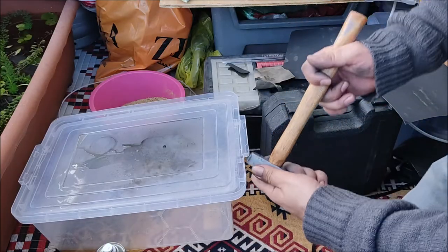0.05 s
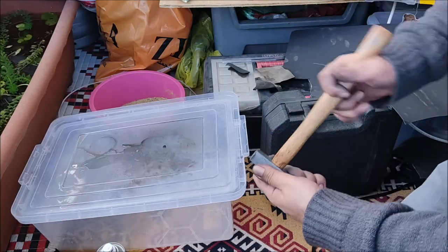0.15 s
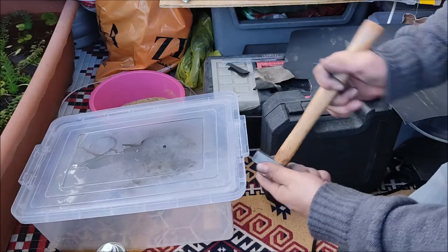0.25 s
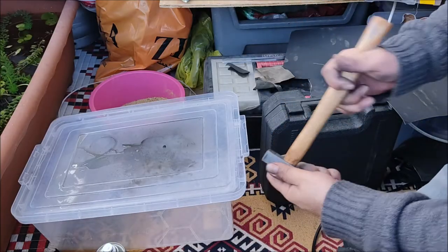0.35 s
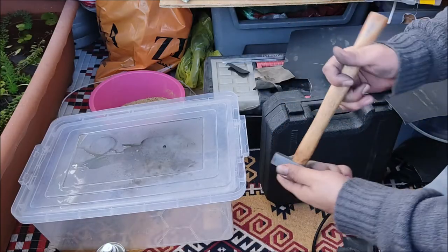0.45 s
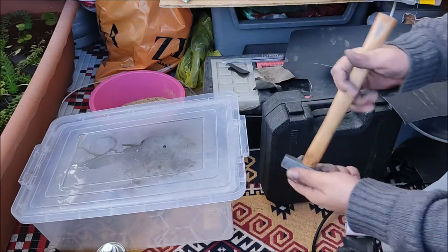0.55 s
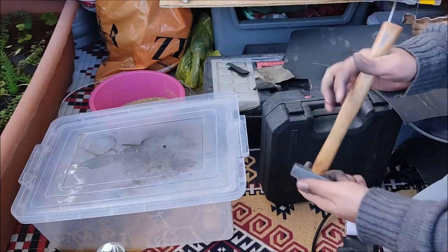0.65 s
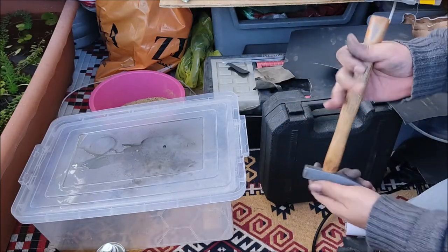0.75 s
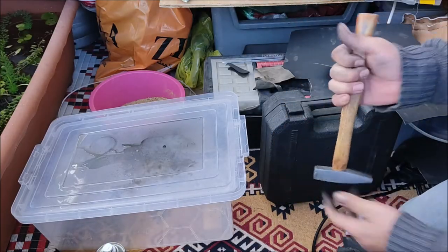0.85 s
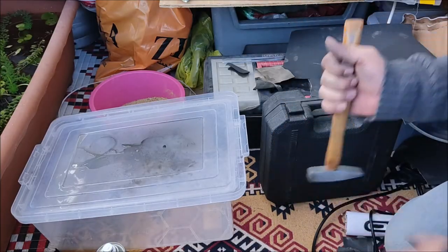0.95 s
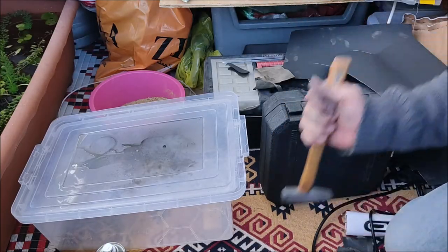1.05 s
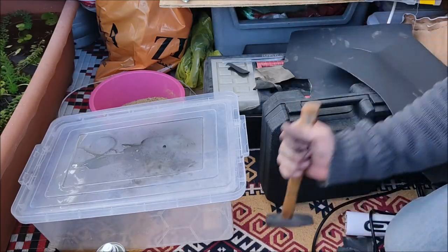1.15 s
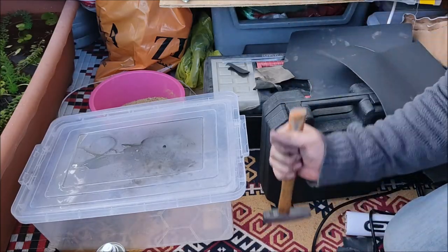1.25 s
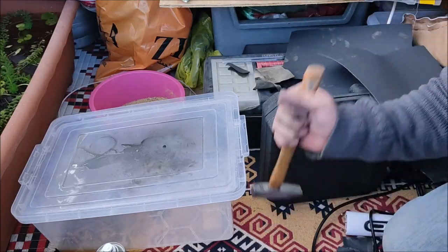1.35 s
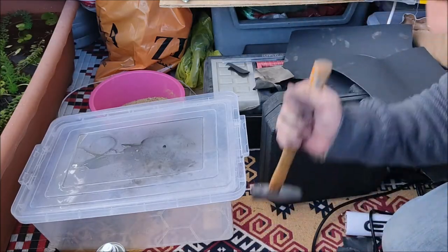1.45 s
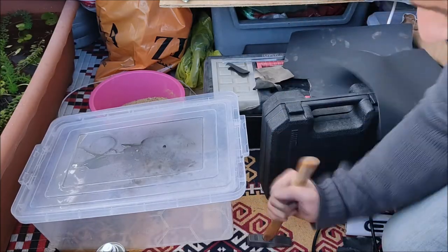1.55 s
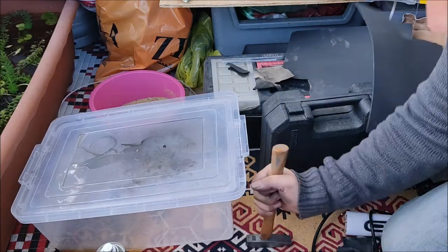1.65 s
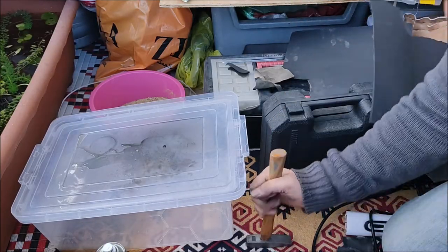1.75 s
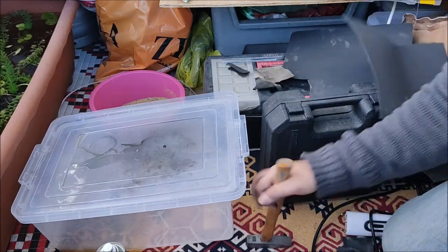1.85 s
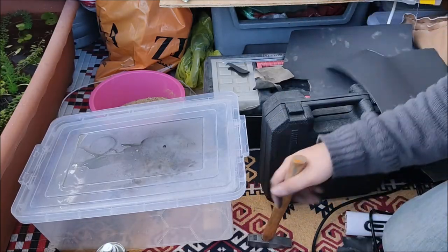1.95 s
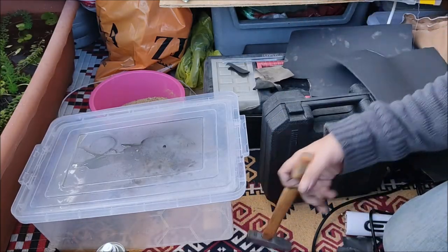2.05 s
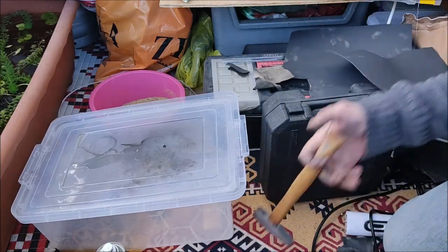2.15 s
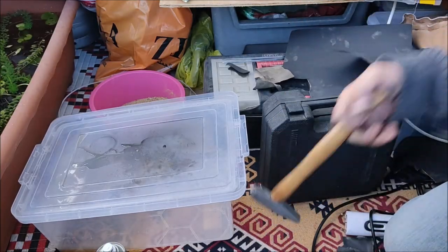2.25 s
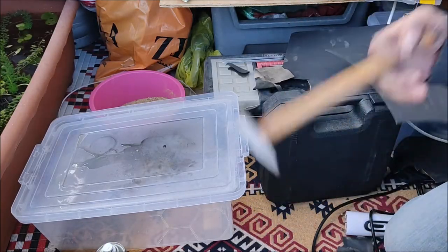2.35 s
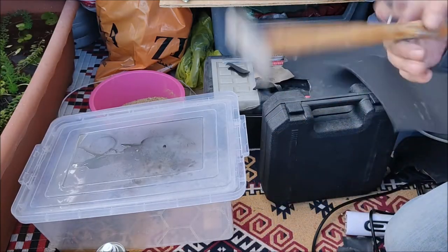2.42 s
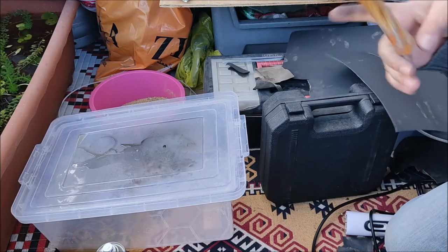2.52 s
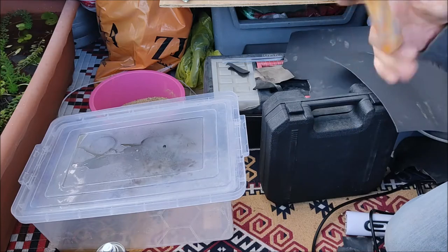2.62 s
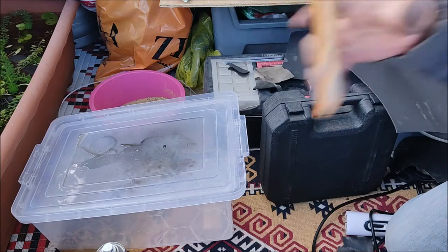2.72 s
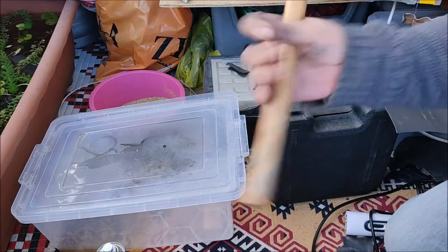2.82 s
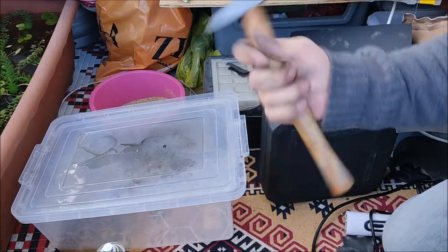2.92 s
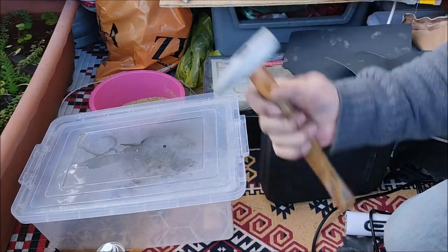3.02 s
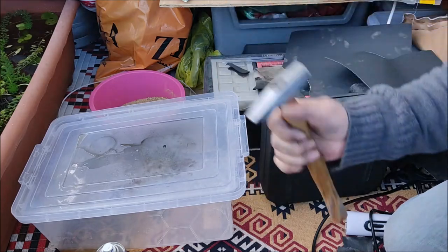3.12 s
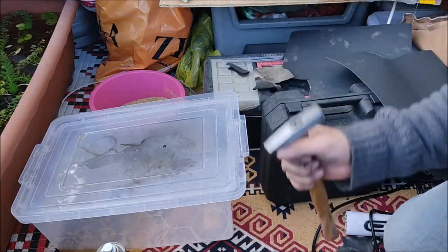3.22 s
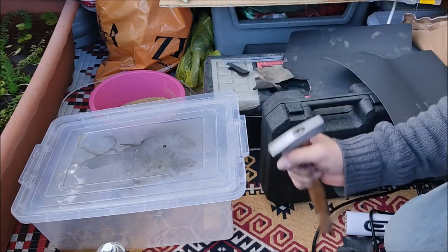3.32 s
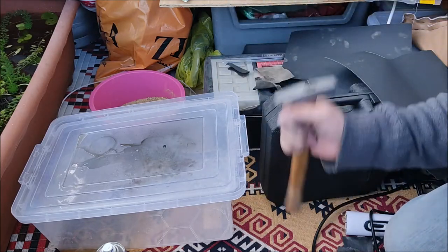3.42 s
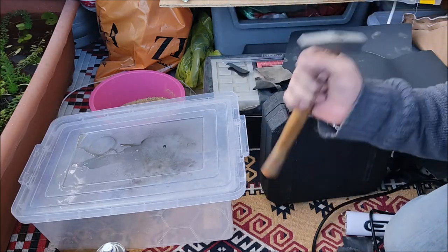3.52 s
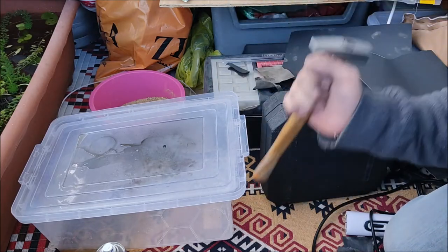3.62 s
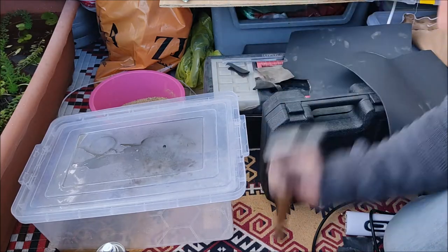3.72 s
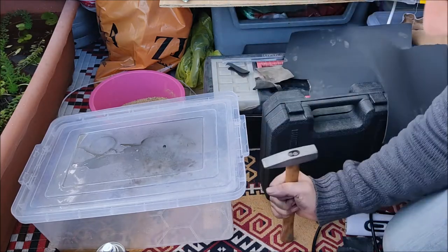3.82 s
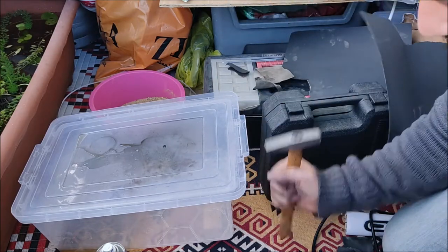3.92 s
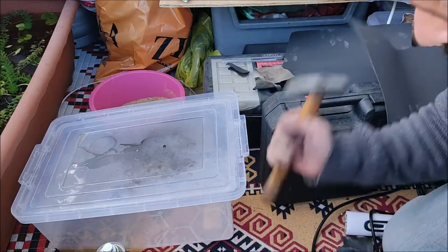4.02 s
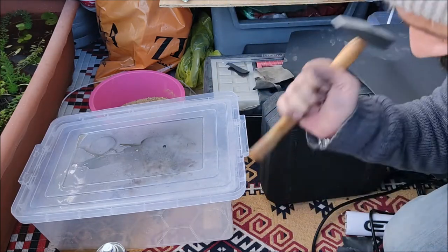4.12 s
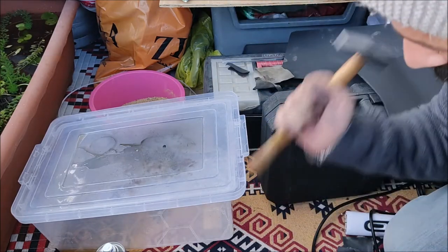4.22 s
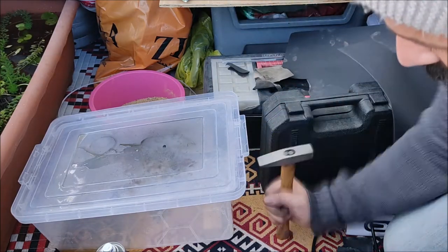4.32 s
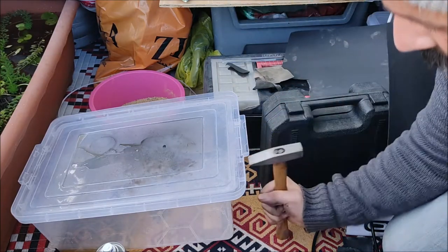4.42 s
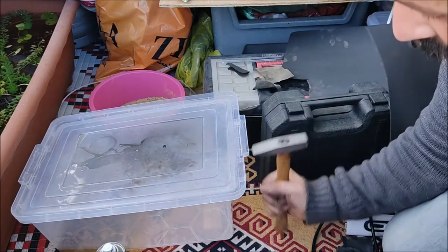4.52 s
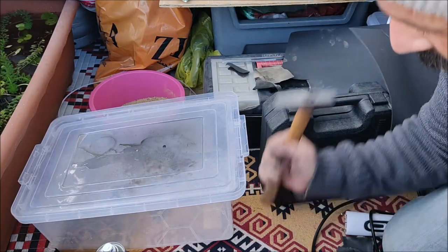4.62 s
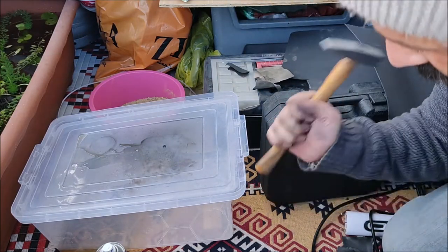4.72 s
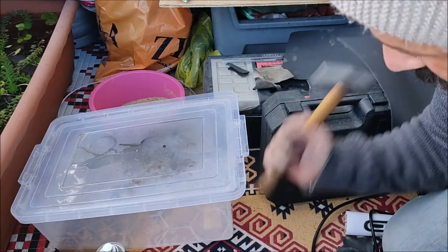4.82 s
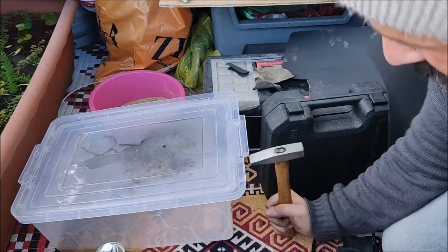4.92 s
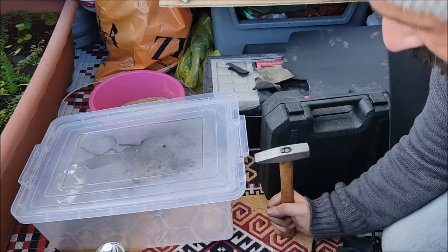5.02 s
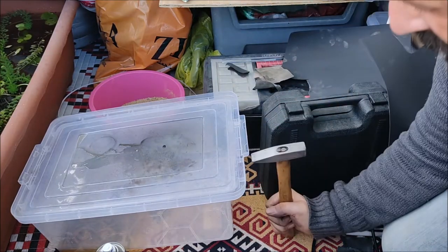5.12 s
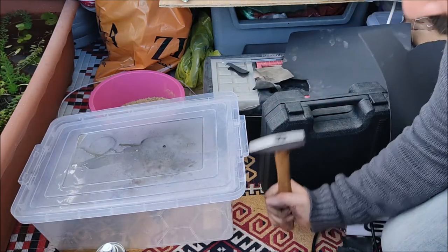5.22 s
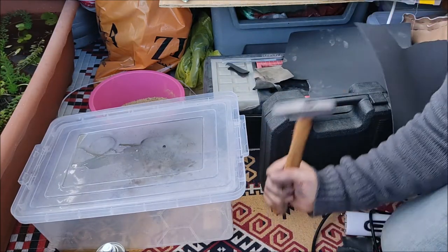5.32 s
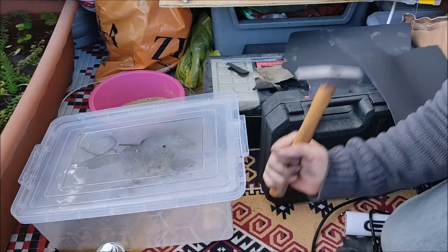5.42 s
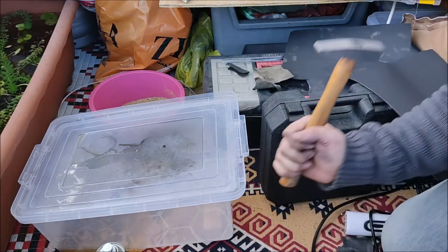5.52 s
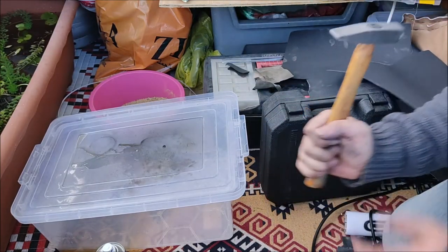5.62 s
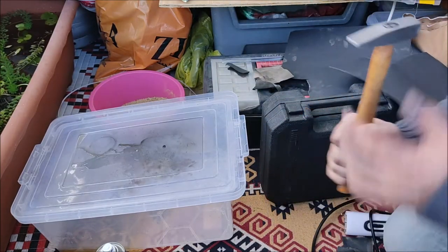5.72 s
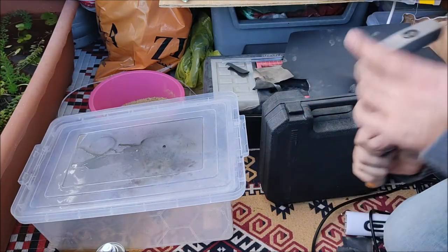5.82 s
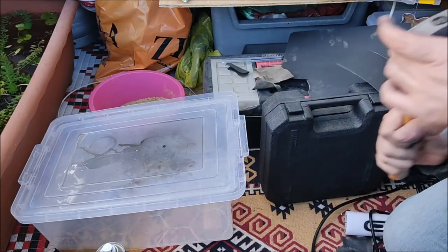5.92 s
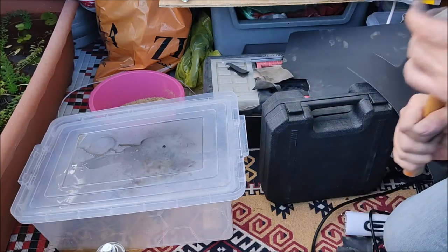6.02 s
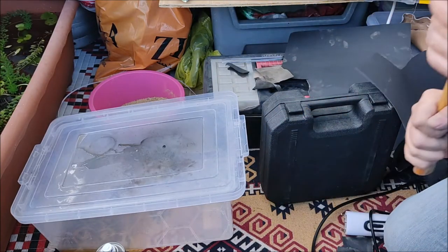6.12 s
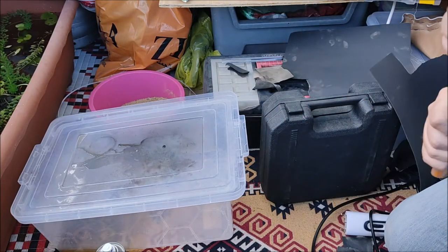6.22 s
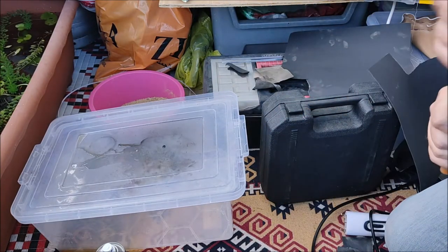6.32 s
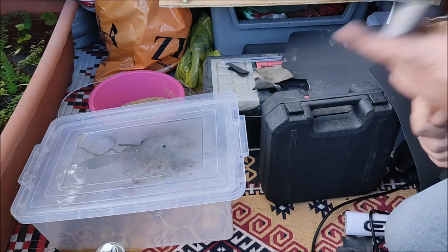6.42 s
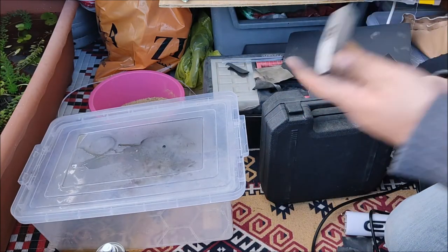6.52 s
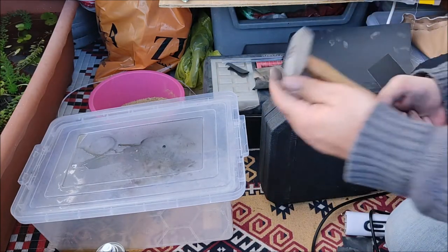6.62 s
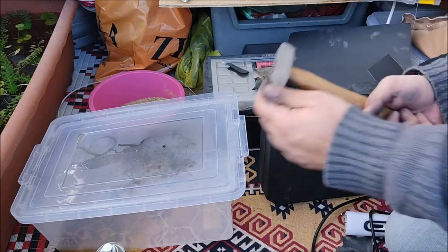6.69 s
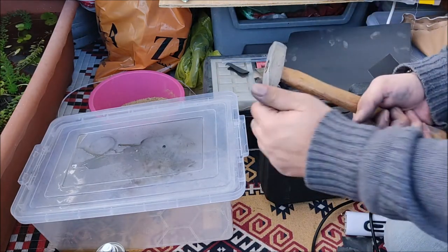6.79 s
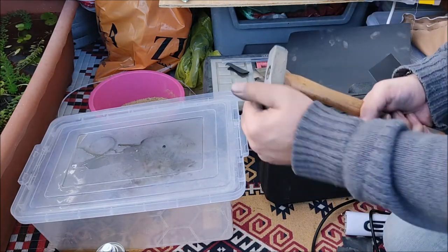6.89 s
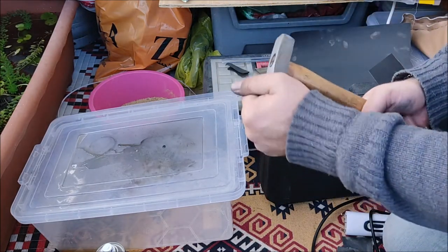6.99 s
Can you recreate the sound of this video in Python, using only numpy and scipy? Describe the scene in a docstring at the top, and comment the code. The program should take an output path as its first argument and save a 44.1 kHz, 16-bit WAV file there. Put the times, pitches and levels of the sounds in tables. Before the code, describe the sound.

Close knocks of a wooden-handled hammer on a hollow rugged floor, evenly spaced, with wool rustle, finger hiss, small taps and faint distant traffic.

```python
"""Hammer on a rug-covered hollow floor

Hammer knocked in a small cluttered space: once head down, three times handle down; an earlier knock dies at the start.
Each contact is a noise crack, decaying sine modes of floor and head, and a short dense tail of decaying noise bands.
Sleeves and fingers rustle as coloured noise under level curves; small knocks fall between; a thin narrow-band scrape
follows the first head-down blow. A low, wavering sine hoot is heard only at the start.
Gusts of 12-26 Hz noise rumble on the microphone over a dull wash of far traffic."""
import sys
import numpy as np
from scipy import signal
from scipy.io import wavfile

SR = 44100
rng = np.random.default_rng(int(sys.argv[2]) if len(sys.argv) > 2 else 0)


def magnitude_from_level(level_db):
    """Linear magnitude for a level in decibels (20 dB per decade)."""
    exponent = np.asarray(level_db, float) / 20
    return 10 ** exponent


def unload_wav(signal):
    """Save mono or channel-first audio to the path in sys.argv[1] as 16-bit WAV at rate SR, clipped to [-1, 1]."""
    wavfile.write(
        sys.argv[1],
        SR,
        np.round(np.clip(np.atleast_2d(signal).T, -1, 1) * 32767).astype(np.int16),
    )


N = 310993  # samples

# Spectra and levels are relative: source trims and the microphone chain follow.
# stereo pair: f/Hz, left-right correlation
CORRELATION = [(60, 0.76), (180, 0.83), (550, 0.37), (1650, -0.061), (4970, 0.082), (15000, -0.3)]
# stereo pair: f/Hz, left minus right/dB
LEFT_LEAN = [(60, 6.5), (120, 3), (240, 6.5), (480, 4), (950, 3), (1890, -0.5), (3770, -2), (7520, -8),
             (15000, -2.5)]
BAND_EDGES_HZ = 40 * 2 ** np.arange(0, 8.7, 1 / 3)  # third octaves

# far traffic spectrum: f/Hz, density/dB per Hz
TRAFFIC_SPECTRUM = [(40, -11.5), (60, -12), (95, -8), (140, -28), (200, 0.5), (260, -19.5), (320, -10.5),
                    (420, -15), (800, -19.5), (1400, -29.5), (3000, -51.5), (6000, -74)]
# far traffic passing: t/s, level/dB
TRAFFIC_LEVEL = [(0.0, -53.5), (0.9, -56), (1.8, -55.5), (2.6, -55), (3.2, -52), (4.0, -51), (4.8, -48),
                 (5.4, -53.5), (6.1, -53), (6.7, -58), (7.05, -54)]
# air on the microphone: t of crest/s, half length/s, level/dB
AIR_GUSTS = [(.2, 0.11, -58), (1.204, 0.11, -62), (3.154, 0.3, -50), (3.794, 0.09, -48), (4.205, 0.22, -62),
             (4.7, 0.1, -61), (5.0, 0.18, -55.5), (5.7, 0.16, -59), (6.609, 0.17, -69), (7.0, 0.14, -66)]
STILL_AIR_DB = -63.5

# hoot: t/s, level/dB
HOOT_LEVEL = [(0.0, -50), (0.1, -53), (0.29, -44.5), (0.42, -53), (0.56, -59.5), (0.63, -50.5)]
HOOT_HZ, SAG_FROM_S, SAG_HZ_PER_S = 438, .42, 250
FLUTTER_DB, FLUTTER_HZ, FLUTTER_CREST_S, FLUTTER_UNTIL_S = 5, 20, 0.184, 0.29

# head dragged over the rug: t/s, f/Hz, level/dB
SCRAPE_TRACK = [(1.8, 1740, -62), (1.879, 1760, -53), (2.0, 1870, -56), (2.121, 1793, -67),
                (2.3, 1770, -52), (2.4, 1726, -59)]

# wool cloth: f/Hz, density/dB per Hz
CLOTH_SPECTRUM = [(300, -12.5), (500, -3.5), (900, -3), (1700, -0.5), (3600, -9.5), (6000, -13),
                  (12000, -45)]
# skin on wood: f/Hz, density/dB per Hz
SKIN_SPECTRUM = [(1200, -20.5), (2500, 6.5), (4000, 0.5), (6000, 2.5), (9000, 1.5), (15500, 2.5)]
# hand movements: t of start/s, length/s, cloth level/dB, skin hiss level/dB
HAND_MOVES = [(.1, 0.028, -72, -71), (.225, 0.022, -54, -68), (.3, 0.26, -62, -63.5),
              (.49, 0.024, -52.5, -70), (.632, 0.38, -56, -52.5), (1.045, .1, -56.5, -56.5),
              (1.168, 0.1, -45, -50), (1.255, 0.11, -46, -47), (1.355, 0.086, -44.5, -55.5),
              (1.48, 0.2, -50.5, -54.5), (1.865, 0.029, -42.5, -52.5), (1.957, .04, -42.5, -56),
              (2.02, 0.033, -40.5, -47.5), (2.15, 0.076, -52.5, -53), (2.232, 0.13, -43.5, -56),
              (2.475, 0.074, -44, -45.5), (2.57, 0.067, -51.5, -59), (2.705, 0.016, -53, -75),
              (2.805, 0.11, -74, -50), (2.89, 0.044, -58, -42), (2.985, 0.041, -58, -40),
              (3.14, .22, -60, -52), (3.36, 0.24, -71, -56.5), (4.07, 0.046, -47, -48.5),
              (4.195, 0.093, -44.5, -57), (4.65, 0.069, -44, -47), (4.74, 0.047, -50, -54.5),
              (4.84, 0.14, -53.5, -64), (5.3, 0.045, -47, -51.5), (5.385, 0.16, -47.5, -56),
              (5.605, 0.088, -42, -49.5), (5.7, 0.062, -46, -60), (5.832, 0.021, -48.5, -55),
              (5.89, 0.24, -53.5, -56), (6.1, 0.036, -45, -49.5), (6.18, 0.15, -53, -55.5),
              (6.26, 0.073, -46, -51.5), (6.345, 0.023, -43.5, -50), (6.51, 0.076, -83.5, -61.5),
              (6.75, 0.16, -65, -68.5), (6.87, 0.13, -69, -61)]
MOVE_RISE_DB_PER_S, MOVE_FALL_DB_PER_S = 690, 177.5
# hands at rest: cloth level/dB, skin hiss level/dB
HANDS_AT_REST = (-66.5, -63)
# sleeve on the way down: t before the blow/s, cloth level/dB, skin hiss level/dB
SLEEVE_SWING = (0.065, -48.5, -51)
# late dull wash after each full blow: length after the blow/s, cloth level/dB, skin hiss level/dB
LATE_WASH = (.21, -45.5, -57)
FULL_BLOW_DB = -35  # stronger contacts take an arm swing

# contacts, soft dull to hard bright: t/s, strength/dB, bass slope/dB per octave downwards,
# treble slope/dB per octave upwards, handle ring/dB
CONTACTS = [(-.08, -26, -4, -1.5, -6), (0.65, -71, 15, -6, -3), (1.053, -49, -15, -18, -3),
            (1.171, -51.5, -9, -18, 0.1), (1.6225, -17, -5.5, -6.5, -0.5), (1.9612, -55.5, 3.5, -1, -14),
            (2.489, -48, 5.5, -2, -5), (3.351, -60.5, 2, -17, 3), (3.8331, -24, 0.2, -3.5, 2.5),
            (4.4073, -21.5, -1, -4.5, 0.6), (4.9781, -21.5, -2, -6, 7), (5.836, -58.5, 6.5, -1, -10)]
# contact spectrum: low end f/Hz, hinge f/Hz, high end f/Hz
CONTACT_RANGE_HZ = (300, 1000, 7700)
# wooden handle, rings high with a hollow below: f/Hz, weight on handle ring (dB per dB)
HANDLE_RING = [(1000, 0), (1600, -0.5), (2600, 0.8), (4500, 1.5), (7700, 0.5)]
# hollow floor, with the steel head on top: f/Hz, level/dB, t60/s
RING_MODES = [(205, -6, .45), (252, -5, .44), (277, -8, .35), (320, -6, .33), (351, -6, .35),
              (394, -3, .34), (475, -4, .33), (528, -5, .33), (630, -5, .33), (682, 0, .29), (757, -3, .33),
              (833, -4, .3), (921, -2, .31), (1077, -6, .33), (1222, -9, .2), (1728, -13, .28),
              (2540, -10, .25), (2600, -10, .3), (2715, -10, .22), (2785, -13, .2), (4170, -18, .23),
              (7690, -6, .13)]
# first sound: f/Hz, density/dB per Hz
CRACK_SPECTRUM = [(100, -16.5), (500, -5), (1500, -10), (2700, -2.5), (5200, -8), (8500, -15.5),
                  (11000, -29.5), (15000, -51.5)]
CRACK_S, CRACK_RISE_S = .015, .001
# reflections: f/Hz, density/dB per Hz
TAIL_SPECTRUM = [(40, -19.5), (130, -9), (200, -10.5), (400, -3), (900, -2), (1300, -8), (2500, -5.5),
                 (5000, -7.5), (9000, -15), (15000, -22.5)]
# reflections: f/Hz, t60/s
TAIL_DECAY = [(60, 0.37), (160, 0.26), (420, 0.29), (1100, 0.26), (2910, 0.23), (7680, 0.18)]
FILL_S = .003

# left and right sound port: f/Hz, width/Hz, lift/dB
SOUND_PORTS = [(8810, 805, 20.5), (7600, 810, 11)]
HISS_DB, TOP_HZ = -70.5, 8390  # hiss ahead of the port response
TREBLE_STOP_HZ = 16300


def rms_one(x):
    """Scale to rms 1."""
    return x / np.sqrt(np.mean(x ** 2) + 1e-20)


def in_time(rows):
    """Interpolate the columns of a time table to one value per sample."""
    s, *columns = np.transpose(rows)
    return [np.interp(np.arange(N) / SR, s, c) for c in columns]


def at_hz(points, hz):
    """Read a spectrum on a log frequency axis."""
    table_hz, values = np.transpose(points)
    return np.interp(np.log(hz), np.log(table_hz), values)


def lean_db(hz):
    """Split the level difference of the stereo pair evenly: left up, right down."""
    return at_hz(LEFT_LEAN, hz) / 2 * np.array([[1], [-1]])


def drift(rate_hz):
    """Random drift of spread 1: noise through a double pole at rate_hz, run at SR / 40."""
    r = np.exp(-2 * np.pi * rate_hz * 40 / SR)
    noise = rng.standard_normal(N // 40 + 2002)
    slow = rms_one(signal.lfilter([1], [1, -2 * r, r * r], noise)[2000:])
    return np.interp(np.arange(N) / 40, np.arange(len(slow)), slow)


def bands(size, min_correlation=-1.0, spike=0.0):
    """Stereo noise bands, flat per Hz, with the pair's lean and correlation; a spike may open them."""
    white = rng.standard_normal((2, 2, size + 2000))  # two mid/side sets for alternate bands
    white[:, 0, 2050] -= spike
    for k, (low, high) in enumerate(zip(BAND_EDGES_HZ, BAND_EDGES_HZ[1:])):
        sos = signal.butter(2, [low, high], "band", fs=SR, output="sos")
        mid, side = signal.sosfilt(sos, white[k % 2])[:, 2000:]
        hz = np.sqrt(low * high)
        alike = np.clip(max(at_hz(CORRELATION, hz), min_correlation), -1, 1)
        pair = np.sqrt(1 + alike) * mid + np.sqrt(1 - alike) * side * [[1], [-1]]
        yield hz, magnitude_from_level(lean_db(hz)) * pair


def steady(spectrum, patchy_db):
    """Coloured noise of rms 1 whose bands flicker, partly together."""
    together = drift(18)
    out = 0
    for hz, band in bands(size=N):
        flicker_db = patchy_db * (together + .7 * drift(12))
        out = out + band * magnitude_from_level(at_hz(spectrum, hz) + flicker_db)
    return rms_one(out)


def air():
    """Pressure swings near the bottom of hearing, in bell-shaped gusts, over a dull wash of far traffic."""
    traffic_db, = in_time(TRAFFIC_LEVEL)
    t = np.arange(N) / SR
    gusts = magnitude_from_level(STILL_AIR_DB)
    for crest_s, half_s, db in AIR_GUSTS:
        gusts = gusts + magnitude_from_level(db) * np.exp(-((t - crest_s) / half_s) ** 2)
    sos = signal.butter(3, [12, 26], "band", fs=SR, output="sos")
    mid, side = signal.sosfilt(sos, rng.standard_normal((2, N + SR)))[:, SR:]
    rumble = rms_one((mid + 0.33 * side * [[1], [-1]]) * magnitude_from_level([[2.2], [-2.2]]))
    traffic = magnitude_from_level(traffic_db + 2.5) * steady(TRAFFIC_SPECTRUM, patchy_db=2.5)
    return magnitude_from_level(7.0) * gusts * rumble + traffic


def hoot():
    """A soft, nearly pure tone that wavers, flutters and sinks in pitch at its end."""
    level_db, = in_time(HOOT_LEVEL)
    t = np.arange(N) / SR
    hz = HOOT_HZ - SAG_HZ_PER_S * np.clip(t - SAG_FROM_S, 0, .2)
    phase = 2 * np.pi * np.cumsum(hz * (1 + 0.0048 * drift(31))) / SR
    gate = np.clip((HOOT_LEVEL[-1][0] - t) / 0.025 + 1, 0, 1)  # 25 ms fade after the last row
    flutter_fade = np.clip((FLUTTER_UNTIL_S - t) / .05, 0, 1)
    flutter_db = FLUTTER_DB * np.cos(2 * np.pi * FLUTTER_HZ * (t - FLUTTER_CREST_S)) * flutter_fade
    tone = np.sin(phase) + magnitude_from_level(-25) * np.sin(2 * phase)
    stereo_db = level_db + flutter_db + drift(39) + [[2.5], [-2.5]]
    return np.sqrt(2) * magnitude_from_level(stereo_db) * gate * tone


def scrape(rate_hz=130):
    """The head dragged over the rug excites one narrow resonance: noise around a moving pitch."""
    hz, level_db = in_time(SCRAPE_TRACK)
    phase = 2 * np.pi * np.cumsum(hz) / SR
    start_s, end_s = SCRAPE_TRACK[0][0], SCRAPE_TRACK[-1][0]
    dragging = abs(np.arange(N) / SR - (start_s + end_s) / 2) < (end_s - start_s) / 2
    noise = drift(rate_hz) * np.sin(phase) + drift(rate_hz) * np.cos(phase)
    return dragging * magnitude_from_level(level_db) * noise


def movements():
    """Cloth and skin levels: moves, swings and a late dull wash after each full blow add in power over the
    resting hands."""
    full_s = [s for s, strength_db, *_ in CONTACTS if strength_db > FULL_BLOW_DB]
    swings = [(s - SLEEVE_SWING[0], *SLEEVE_SWING) for s in full_s]
    late_washes = [(s, *LATE_WASH) for s in full_s]
    t = np.arange(N // 40 + 2) * 40 / SR
    power = magnitude_from_level(np.array(HANDS_AT_REST))[:, None] ** 2 + 0 * t
    for s, length_s, *level_db in HAND_MOVES + swings + late_washes:
        rise_db = -MOVE_RISE_DB_PER_S * np.maximum(s + 0.014 - t, 0)  # full level 14 ms after start
        fall_db = -MOVE_FALL_DB_PER_S * np.maximum(t - s - length_s, 0)
        power = power + magnitude_from_level(np.array(level_db)[:, None] + rise_db + fall_db) ** 2
    return [np.interp(np.arange(N) / SR, t, np.sqrt(p)) for p in power]


def rustle():
    """Wool rubs dully; skin sliding on the handle hisses, grainy from tiny slips."""
    cloth, skin = movements()
    slips = magnitude_from_level(drift(200))
    wool = magnitude_from_level(-2.5) * cloth * slips * steady(CLOTH_SPECTRUM, patchy_db=1.0)
    hiss = magnitude_from_level(-4.5) * skin * slips * steady(SKIN_SPECTRUM, patchy_db=1.0)
    return wool + hiss


def contact_db(strength_db, below_db, above_db, ring_db):
    """Spectrum of one contact: two slopes hinged at a middle pitch, coloured by the ring of the handle."""
    low, hinge, high = CONTACT_RANGE_HZ
    hz = np.geomspace(low, high, 24)
    bass_db = below_db * np.log2(np.maximum(hinge / hz, 1))
    treble_db = above_db * np.log2(np.maximum(hz / hinge, 1))
    handle_db = ring_db * at_hz(HANDLE_RING, hz)
    return np.transpose([hz, strength_db + bass_db + treble_db + handle_db])


def crack(contact, size=2000, crack_db=31):
    """First sound of a contact: a spike-led noise burst, nearly mono, the lows fading later."""
    t = np.arange(size) / SR
    rise = 1 - np.exp(-t / CRACK_RISE_S)
    out = np.zeros((2, size))
    for hz, band in bands(size=size, min_correlation=0.97, spike=7.4):
        fade_db = -60 * t / (CRACK_S + 6 / hz)
        out += rise * band * magnitude_from_level(at_hz(contact, hz) + at_hz(CRACK_SPECTRUM, hz) + crack_db + fade_db)
    return out


def tail(contact, noise_bands, t, tail_db=24, fill_cycles=0.52):
    """Reflections of a contact: they gather first, the lows later, then each band dies at its own t60."""
    shift = rng.integers(len(t))  # each tail takes a random stretch of noise
    out = np.zeros((2, len(t)))
    for hz, band in noise_bands:
        fill = 1 - np.exp(-t / (FILL_S + fill_cycles / hz))
        decay_db = -60 * t / at_hz(TAIL_DECAY, hz)
        level_db = at_hz(contact, hz) + at_hz(TAIL_SPECTRUM, hz) + tail_db + decay_db
        out += band[:, shift:shift + len(t)] * fill * magnitude_from_level(level_db)
    return out


def ring(contact, t, modes_db=1.0):
    """Modes of floor and head: decaying sines, their levels and phases varying from contact to contact."""
    out = np.zeros((2, len(t)))
    for hz, mode_db, t60_s in RING_MODES:
        spread = rng.normal(0, 1, (2, 1)) * (1 - at_hz(CORRELATION, hz))
        phase = rng.uniform(0, 2 * np.pi) + spread
        struck_db = mode_db + rng.normal(0, 2)
        level_db = at_hz(contact, hz) + struck_db + modes_db + lean_db(hz) - 60 * t / t60_s
        build_up = 1 - np.exp(-t * hz / 1.5)  # time constant 1.5 cycles
        out += build_up * np.sin(2 * np.pi * hz * t + phase) * magnitude_from_level(level_db)
    return out


def blows():
    """Every contact gives a crack, sets the floor ringing and fills the space with a dying tail."""
    t = np.arange(int(.7 * SR)) / SR
    noise_bands = list(bands(size=2 * len(t)))
    out = np.zeros((2, N + 2 * SR))  # 1 s margin at each end
    for s, *stroke in CONTACTS:
        contact = contact_db(*stroke)
        sound = tail(contact, noise_bands, t) + ring(contact, t)
        first = crack(contact)
        sound[:, :first.shape[1]] += first
        at = round((s + 1) * SR)
        out[:, at:at + len(t)] += sound
    return out[:, SR:SR + N]


def scene():
    """Sum of all sources, in stereo."""
    return air() + hoot() + scrape() + rustle() + blows()


def microphones(x, above_top_db=-14):
    """Each sound port lifts the treble at its own resonance; above TOP_HZ the response drops to a low shelf."""
    noisy = x + magnitude_from_level(HISS_DB) * rng.standard_normal(x.shape)
    out = []
    for channel, (hz, width_hz, lift_db) in zip(noisy, SOUND_PORTS):
        r = np.exp(-np.pi * width_hz / SR)
        zeros = [(1 - r * r) / 2, 0, (r * r - 1) / 2]
        poles = [1, -2 * r * np.cos(2 * np.pi * hz / SR), r * r]
        out.append(channel + magnitude_from_level(lift_db) * signal.lfilter(zeros, poles, channel))
    low = signal.sosfilt(signal.butter(8, TOP_HZ, fs=SR, output="sos"), out)
    high = signal.sosfilt(signal.butter(8, TOP_HZ, "high", fs=SR, output="sos"), out)
    return low + magnitude_from_level(above_top_db) * high


def limiter(x, ceiling_db=-13, over_fall_db_per_s=300, smoothing_s=0.0037):
    """Gain drops by 0.6 of the held overshoot, smoothed; the held overshoot falls at a steady rate."""
    ramp = over_fall_db_per_s * np.arange(N) / SR
    peak_db = 20 * np.log10(np.abs(x).max(axis=0) + 1e-9)
    over_db = np.maximum(peak_db - ceiling_db, 0)
    held_db = np.maximum.accumulate(over_db + ramp) - ramp
    r = np.exp(-1 / (smoothing_s * SR))
    return x * magnitude_from_level(-.6 * signal.lfilter([1 - r], [1, -r], held_db))


def band_limit(x):
    """A steep low-pass at the top of the band."""
    return signal.sosfilt(signal.butter(12, 16610, fs=SR, output="sos"), x)


def record(dry):
    """Microphones, limiter, soft ceiling, treble cut and final stage."""
    limited = limiter(microphones(dry))
    rounded = 1.1 * np.tanh(limited / 1.1)
    treble_cut = signal.cheby2(10, 50, TREBLE_STOP_HZ, fs=SR, output="sos")
    mix = signal.sosfilt(treble_cut, rounded)
    return band_limit(mix)


dry = scene()
out = record(dry)
unload_wav(out)
```